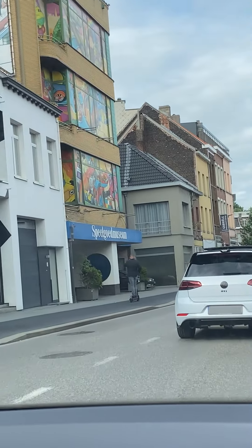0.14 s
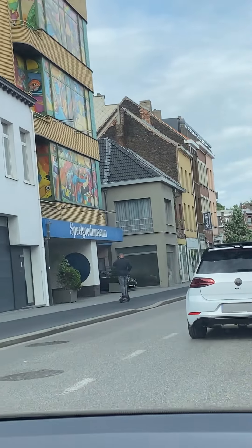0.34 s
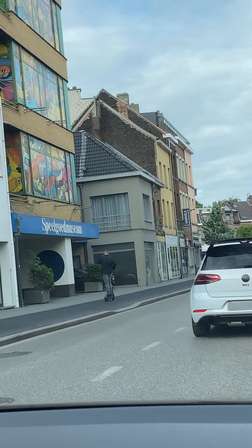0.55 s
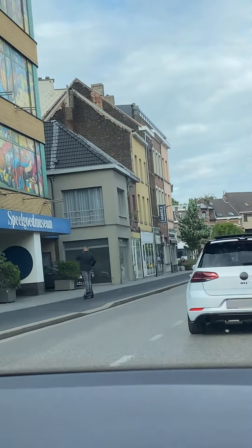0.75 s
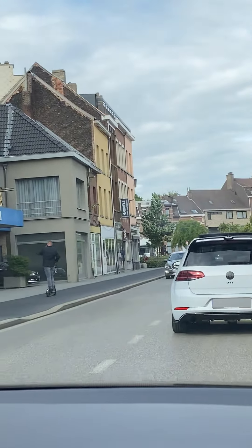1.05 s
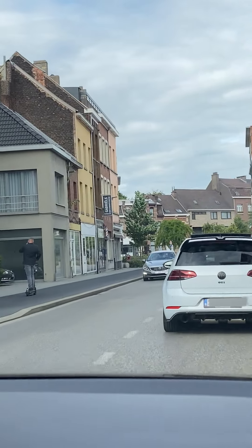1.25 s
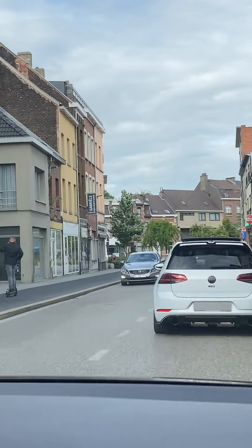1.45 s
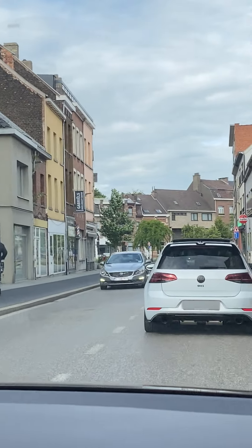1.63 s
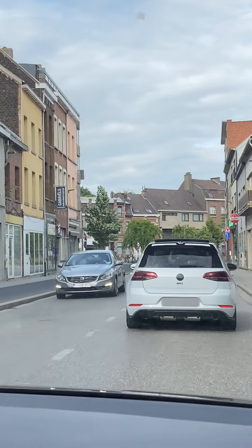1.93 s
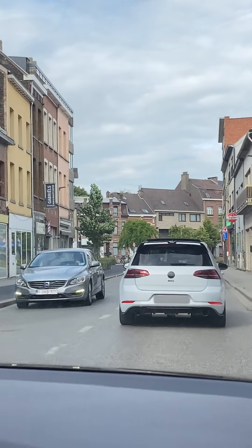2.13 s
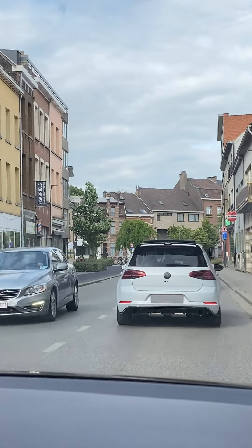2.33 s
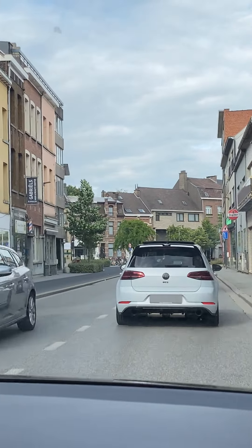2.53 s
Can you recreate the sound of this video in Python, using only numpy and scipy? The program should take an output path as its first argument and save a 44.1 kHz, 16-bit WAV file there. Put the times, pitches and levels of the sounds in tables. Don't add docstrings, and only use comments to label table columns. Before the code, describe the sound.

Exhaust backfire from a car ahead: a dense volley of dull, sharp-edged pops, thinning out, then a raspy rev that fades, over low road rumble and engine hum, heard in stereo from inside a following car.

```python
import sys
import numpy as np
from scipy import signal
from scipy.fft import rfft, irfft, next_fast_len
from scipy.io import wavfile
from scipy.ndimage import uniform_filter1d, minimum_filter1d

SR = 44100
rng = np.random.default_rng(int(sys.argv[2]) if len(sys.argv) > 2 else 0)


def unload_audio(sound):
    columns = np.transpose(np.atleast_2d(sound))
    steps = np.round(np.clip(columns, -1, 1) * 32767)
    wavfile.write(sys.argv[1], SR, steps.astype(np.int16))


def ratio(d):
    e = np.asarray(d, float) / 20
    return 10 ** e


N = 118188
TIME = np.arange(N) / SR


def even(x):
    return x / np.sqrt(np.mean(x ** 2) + 1e-20)


def curve(rows, col):
    rows = np.array(rows)
    return np.interp(TIME, rows[:, 0], rows[:, col])


def colour(x, points):
    f, db = np.transpose(points)
    hz = np.fft.rfftfreq(x.shape[-1], 1 / SR) + 1
    octaves_outside = np.maximum(np.log2(f[0] / hz), 0) + np.maximum(np.log2(hz / f[-1]), 0)
    shape_db = np.interp(np.log(hz), np.log(f + 1), db) - 30 * octaves_outside
    return irfft(rfft(x) * ratio(shape_db), x.shape[-1])


def drift(rate_hz):
    t = np.arange(0, N + 64, 64) / SR
    wander = 0
    for f in np.geomspace(rate_hz / 10, rate_hz, 20):
        wander = wander + np.sin(2 * np.pi * (f * t + rng.random())) / np.sqrt(f)
    return np.interp(TIME, t, even(wander))


def ring(x, hz, width):
    turn = np.exp(2j * np.pi * np.cumsum(hz * np.ones(len(x))) / SR)
    r = np.exp(-np.pi * width / SR)
    return 2 * (turn * signal.lfilter([1 - r], [1, -r], x / turn)).real


def add(mix, s, sound):
    part = mix[..., round(s * SR):][..., :sound.shape[-1]]
    part += sound[..., :part.shape[-1]]


def tail(x, t60):
    t = np.arange(SR // 2) / SR
    build_up = np.minimum(t / 0.00056, 1)
    taps = rng.standard_normal((2, len(t))) * ratio(-60 * t / t60) * build_up
    taps = taps / np.linalg.norm(taps, axis=1)[:, None]
    return signal.fftconvolve(x, taps, axes=1)[:, :N]


def road():
    # start in seconds, road roughness in dB.
    surface = [
        (0.0, -18),
        (0.01, -17),
        (0.54, -11),
        (0.61, -8.5),
        (0.81, -18),
        (0.87, -32),
        (1.1, -49),
        (2.57, -33.5),
        (2.68, -40),
    ]
    # frequency in Hz, density in dB per Hz.
    body_spectrum = [(12, -26), (25, -4), (64, -3), (91, -1.5), (129, -4), (401, -21), (439, -24),
                     (1500, -37), (1950, -71), (3300, -120)]
    # frequency in Hz, density in dB per Hz.
    tyre_spectrum = [(700, -1), (1150, 0), (1720, -4.5), (2430, -6), (3500, -17), (6600, -21.5),
                     (10000, -36.5), (12000, -35), (14200, -47.5)]
    rumble_db, bump_db, hiss_db = -25, 3, -37.5
    rise_db, rise_s = -6.5, 1
    alike = .3

    rough = curve(surface, 1)
    rumble_level_db = rumble_db + 0.32 * (rough - rough.mean()) + bump_db * drift(16)
    rumble = even(colour(rng.standard_normal((2, N)), body_spectrum)) * ratio(rumble_level_db)
    patchy = rng.standard_normal((2, N)) * ratio(1.5 * drift(40.16))
    hiss_level_db = hiss_db + rise_db * np.maximum(1 - TIME / rise_s, 0)
    a, b = rumble + even(colour(patchy, tyre_spectrum)) * ratio(hiss_level_db)
    return np.array([a, alike * a + np.sqrt(1 - alike ** 2) * b])


def ticks():
    # start in seconds, strength in dB.
    rattles = [
        (0.034, -57),
        (0.4977, -46),
        (0.5386, -42),
        (0.7936, -47),
        (2.235, -45),
        (2.6714, -60),
    ]
    level_db, t60 = -6, 0.023
    trim_spectrum = [(3000, -13), (6500, 16), (10000, 4), (13000, 10)]  # Hz, dB
    t, out = np.arange(2048) / SR, np.zeros(N)
    for s, db in rattles:
        noise = colour(rng.standard_normal(len(t)), trim_spectrum)
        add(out, s, ratio(db + level_db - 60 * t / t60) * noise)
    return out


def jolts():
    # start in seconds, strength in dB, pitch in Hz, length in seconds.
    thuds = [
        (0.178, -10, 55.4, 0.036),
        (0.301, -10.5, 60.4, 0.07),
        (0.579, -7.5, 61.6, 0.073),
        (0.84, -16.5, 50, 0.065),
        (0.893, -12, 53, 0.056),
    ]
    out = np.zeros(N)
    for s, db, hz, length in thuds:
        t = np.arange(0, length, 1 / SR)
        swell = np.sqrt(abs(np.sin(np.pi * t / length)))
        add(out, s, ratio(db) * swell * np.sin(2 * np.pi * hz * t))
    return out


def hum():
    # time in seconds, hum frequency in Hz, level in dB.
    own_engine = [
        (0, 54, -26),
        (.3, 60, -28),
        (.62, 62, -25),
        (.75, 53, -30),
        (1.2, 44, -36),
        (1.6, 48, -31),
        (1.97, 56.5, -27),
        (2.15, 60, -22),
        (2.29, 61.5, -21),
        (2.68, 63, -20),
    ]
    overtones_db, roughness = [0, -6, -25], 0.093
    pan_db_per_s = 1.5

    hz = curve(own_engine, 1)
    turns = np.cumsum(hz) / SR
    lines = 0
    for k, db in enumerate(overtones_db, 1):
        rough = roughness * even(ring(rng.standard_normal(N), k * hz, 40))
        line = np.cos(2 * np.pi * k * turns) + rough
        lines = lines + ratio(db + 0.5 * drift(24)) * np.sqrt(2) * line
    pan_db = pan_db_per_s * np.maximum(TIME - 1, 0)
    return ratio(curve(own_engine, 2) + np.array([pan_db, -pan_db]) / 2) * lines


def exhaust():
    # time in seconds, throttle in dB, pipe boom in dB, second order in dB, pipe bark in dB.
    ahead = [(.6, -43.5, -40, -32.5, -29), (.95, -44.5, -52.5, -33, -32), (1.09, -47, -37.5, -34.5, -35.5),
             (1.16, -39.5, -29.5, -25, -36.5), (1.26, -36, -26.5, -24, -26.5),
             (1.33, -28.5, -12.5, -13.5, -18.5), (1.43, -25, -13.5, -19.5, -16),
             (1.48, -25.5, -9.5, -21, -21), (1.53, -27.5, -14.5, -17.5, -16), (1.6, -31, -18.5, -18, -20),
             (1.66, -29, -15, -30, -23), (1.73, -30, -21, -30.5, -20.5), (1.8, -33.5, -20.5, -30, -24),
             (1.9, -35.5, -25, -26.5, -28.5), (2.05, -41, -22.5, -26.5, -27),
             (2.17, -40.5, -26.5, -35, -44), (2.4, -44, -32.5, -32, -32), (2.68, -37, -32, -34, -39)]
    # time in seconds, firing rate in Hz.
    revs = [
        (.6, 77.96),
        (.95, 85.47),
        (1.2, 91.5),
        (1.34, 97.3),
        (1.45, 101),
        (1.62, 100.4),
        (1.8, 106.3),
        (2.05, 108.4),
        (2.4, 109.5),
        (2.68, 110),
    ]
    # frequency in Hz, weight in dB.
    pipe = [(290, -20), (400, -11), (500, -14.5), (590, -19), (680, -10.5), (755, -19), (805, -11.5),
            (890, -20.5)]
    # frequency in Hz, density in dB per Hz.
    rasp_spectrum = [(530, 3.5), (900, 14), (998, -41), (1170, 8.5), (1830, -14), (2080, -0.5),
                     (2970, -8.5), (6200, -14.5), (14000, -56)]
    # frequency in Hz, width in Hz, level in dB.
    rasp_rings = [(1657, 25, -6), (2028, 53, 0), (2470, 90, -17), (2710, 90, -10), (3270, 66, -11.5),
                  (4110, 20, -26), (5760, 90, -13.5)]
    # frequency in Hz, density in dB per Hz.
    roar_spectrum = [(35, -36), (60, -63), (113, 3), (222, -9.5), (260, -11), (417, -9.5), (1500, -28),
                     (1950, -78), (3300, -120)]
    full_db, fade_in_s = -29.5, 0.58
    note_db, bark_db, pipe_fall_db_per_hz = 1.5, 5, 0.1
    order_drift_db, uneven_db, uneven_drift_db = 2, -28, 3
    gate_depth, rings_db = 0.07, -7.5
    rasp_db, rasp_slope = -31, 1.62
    roar_db, roar_slope = -22, 0.29

    throttle = curve(ahead, 1) - full_db
    fade_in = np.clip((TIME - ahead[0][0]) / fade_in_s + 1, 0, 1)
    firing_hz = curve(revs, 1)
    turns = np.cumsum(firing_hz * (1 + 0.0085 * drift(30.19))) / SR

    bark = curve(ahead, 4) + bark_db
    pipe_hz, weight_db = np.transpose(pipe)
    orders_hz = np.arange(3, 11)[:, None] * firing_hz
    above_hz = np.maximum(orders_hz - pipe_hz[-1], 0)
    pipe_db = np.interp(orders_hz, pipe_hz, weight_db) - pipe_fall_db_per_hz * above_hz
    levels_db = [curve(ahead, 2) + note_db, curve(ahead, 3) + note_db, *(bark + pipe_db)]
    note = 0
    for k, db in enumerate(levels_db, 1):
        level = ratio(db + order_drift_db * (k > 2) * drift(7.91))
        note = note + level * np.cos(2 * np.pi * k * turns + 0.422 * k * k)

    uneven = 0
    for k in range(1, 9):
        half_order = np.cos(2 * np.pi * (k - .5) * turns)
        uneven = uneven + half_order * ratio(uneven_drift_db * drift(7.3))
    note = note + ratio(uneven_db + bark) * uneven

    gate = 1 + gate_depth * np.cos(2 * np.pi * turns)
    hiss = gate * rng.standard_normal(N)
    rings = sum(ratio(db) * even(ring(hiss, hz, width)) for hz, width, db in rasp_rings)
    rasp = even(colour(hiss, rasp_spectrum)) + ratio(rings_db) * even(rings)
    roar = even(colour(gate * rng.standard_normal(N), roar_spectrum))
    flow = ratio(rasp_db + rasp_slope * throttle) * rasp + ratio(roar_db + roar_slope * throttle) * roar
    return fade_in * (np.sqrt(2) * note + flow)


def snap_and_body(t, noise):
    # frequency in Hz, density in dB per Hz.
    crack_spectrum = [(120, -4), (250, 2.5), (450, 0), (800, -7), (1300, -18.5), (1800, -31), (2500, -17),
                      (3300, -50)]
    rise_s, snap_t60, body_t60, body_db, body_top_hz = .001, 0.024, 0.051, -2.5, 745
    snap = even(colour(noise, crack_spectrum))
    body = signal.lfilter(*signal.butter(2, body_top_hz, fs=SR), snap)
    decaying = snap * ratio(-60 * t / snap_t60) + body * ratio(body_db - 60 * t / body_t60)
    return np.minimum(t / rise_s, 1) * decaying


def pressure_edge(t, noise):
    low_hz, high_hz, fuzz, t60 = 410, 1086, 0.26, 0.015
    edge = (t == 0) + fuzz * noise * ratio(-60 * t / t60)
    edge = signal.lfilter(*signal.butter(1, low_hz, 'high', fs=SR), edge)
    edge = signal.lfilter(*signal.bessel(6, high_hz, norm='mag', fs=SR), edge)
    return 2 * edge / abs(edge).max()


def thump(t, chance):
    pitch_hz, sag, t60 = 144.2, 0.2, 0.063
    hz = pitch_hz * np.exp(0.4 * np.tanh(chance)) * (1 - sag * np.minimum(t / t60, 1))
    return np.sin(2 * np.pi * np.cumsum(hz) / SR) * ratio(-60 * t / t60)


def boom(t):
    level_db, start_hz, end_hz, length_s = -12.5, 161, 70.7, 0.16
    u = np.minimum(t / length_s, 1)
    hz = start_hz * (end_hz / start_hz) ** u
    return ratio(level_db) * np.sin(np.pi * u) * np.sin(2 * np.pi * np.cumsum(hz) / SR)


def pops():
    # start in seconds, strength in dB, bass in dB, edge in dB.
    backfires = [(.181, -11.5, -10.5, -8), (0.189, -12, -1.5, -2), (.246, -7.5, -8, 1.5),
                 (.25, -11.5, -6, 4.5), (.255, -14, 2, -4.5), (.267, -16, -8, 9.5), (.278, -19, -4.5, 6.5),
                 (0.297, -10, 1, 2), (.305, -11.5, -1.5, 3), (.314, -13.5, -2, -6), (.328, -13, 3, -3),
                 (.338, -13.5, 0.5, -8.5), (.345, -13.5, 8.5, -6.5), (.356, -15, -3, -3),
                 (.366, -12.5, -6.5, 0), (.379, -5.5, -8.5, 8.5), (.39, -10.5, -4, 0), (.416, -9, -14, 0.5),
                 (.423, -11.5, -6, 3.5), (.436, -14, 3.5, -9), (.451, -13.5, 6.5, -12),
                 (.461, -13.5, 7.5, -4), (.471, -13.5, 3.5, 2), (0.481, -16, -3.5, 2.5),
                 (.499, -17, -2, 6.5), (.511, -19, 0, -2), (.523, -16.5, 4, -2.5), (.532, -14.5, -5.5, 1),
                 (0.537, -15, -2, 1.5), (0.543, -15, -3.5, -5), (.553, -15, 1, 3.5), (.562, -17, 4.5, -2.5),
                 (.588, -15.5, -4.5, 4), (.602, -20.5, 1, 8.5), (.608, -21.5, 3, -9),
                 (.636, -20, -1.5, 1.5), (.655, -21, 0, -4.5), (.683, -19, 1.5, -8), (.715, -22, -1, -8),
                 (.75, -20, -9, -9), (.924, -14, -4.5, -3.5), (1.023, -27.5, -1, -4)]
    crack_level_db, edge_level_db, thump_level_db, boom_s = -2, -6, 1, 0.23
    pan_start_db, pan_db_per_s = -10.5, 10
    street_db, street_t60, street_top_hz = -9, .4, 450

    t, out = np.arange(8192) / SR, np.zeros((2, N))
    for s, db, bass_db, edge_db in backfires:
        noise = rng.standard_normal(len(t))
        crack = snap_and_body(t, noise) + ratio(edge_level_db + edge_db) * pressure_edge(t, noise)
        pan_db = min(pan_start_db + pan_db_per_s * (s - backfires[0][0]), 0)
        panned = ratio(crack_level_db) * crack * ratio([[pan_db / 2], [-pan_db / 2]])
        add(out, s, ratio(db) * (panned + ratio(thump_level_db + bass_db) * thump(t, noise[0])))
    add(out, boom_s, boom(t))
    dull = signal.lfilter(*signal.butter(2, street_top_hz, fs=SR), out)
    return out + ratio(street_db) * tail(dull, street_t60)


def two_ports(mix):
    # frequency in Hz, left-right difference in dB.
    lean_table = [(30, -1), (110, 0.5), (200, 1.5), (370, 0), (670, -0.5), (1230, -1.5), (2250, 2),
                  (4110, -1.5), (7510, -4.5), (13700, 8.5)]
    lag_s, lead_in = 20.5 / 44100, 2048
    size = next_fast_len(N + SR // 10)
    hz = np.fft.rfftfreq(size, 1 / SR)
    lean_hz, lean_db = np.transpose(lean_table)
    lean = ratio(np.interp(np.log(hz + 1), np.log(lean_hz), lean_db) / 2)
    response = np.array([lean * np.exp(-2j * np.pi * hz * lag_s), 1 / lean])
    padded = np.pad(mix, ((0, 0), (lead_in, 0)), 'reflect')
    return irfft(rfft(padded, size) * response, size)[:, lead_in:lead_in + N]


def scene():
    cabin_db, cabin_t60 = -5, .04
    direct, echo_t60 = .82, .3
    bangs = pops() + jolts() + hum()
    engine_ahead = np.tile(exhaust(), (2, 1))
    mix = bangs + ratio(cabin_db) * tail(bangs, cabin_t60) + road() + ticks()
    mix = mix + direct * engine_ahead + np.sqrt(1 - direct ** 2) * tail(engine_ahead, echo_t60)
    return two_ports(mix)


def low_pass(x):
    return signal.sosfilt(signal.butter(12, 14340, fs=SR, output="sos"), x)


def record(dry):
    mono_hz, edge_hz, ceiling = 10500, 14340, .9
    mirrored = np.hstack([dry, dry[:, ::-1]])
    hz = np.fft.rfftfreq(2 * N, 1 / SR)
    left, right = rfft(mirrored) * (hz < edge_hz) * np.minimum(hz / 18, 1) ** 2
    merge = np.clip((hz - mono_hz) / 800 + .5, 0, .45)
    x = irfft(np.array([left + merge * (right - left), right]), 2 * N)[:, :N]
    room = np.minimum(ceiling / (abs(x).max(0) + 1e-9), 1)
    gain = uniform_filter1d(minimum_filter1d(room, size=301), size=201)
    return low_pass(x * gain)


dry = scene()
out = record(dry)
unload_audio(out)
```